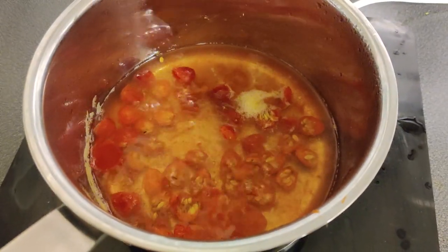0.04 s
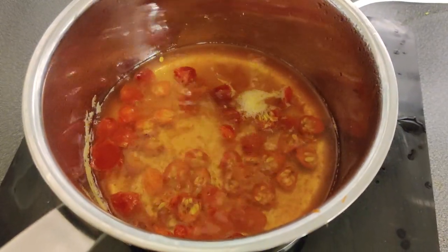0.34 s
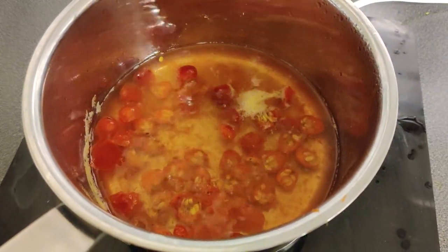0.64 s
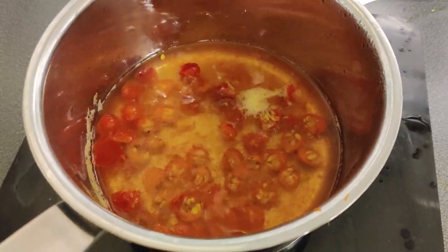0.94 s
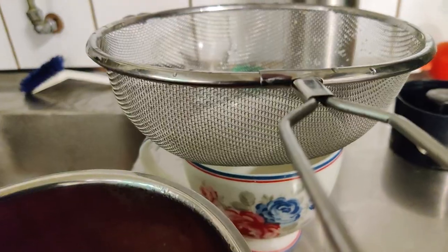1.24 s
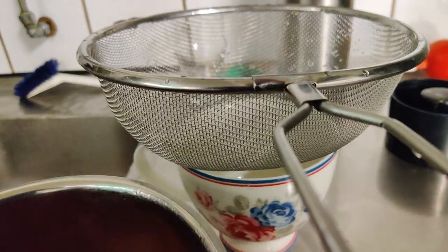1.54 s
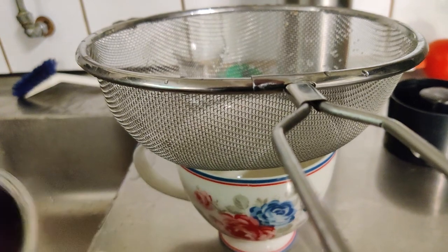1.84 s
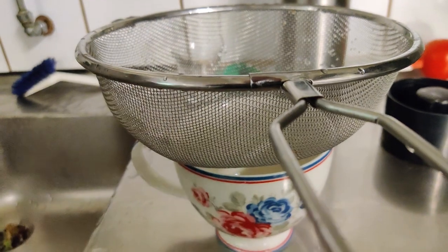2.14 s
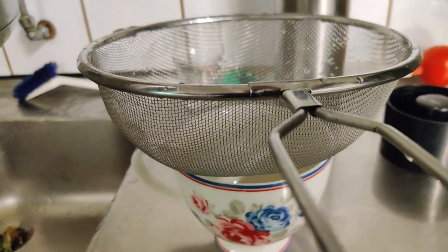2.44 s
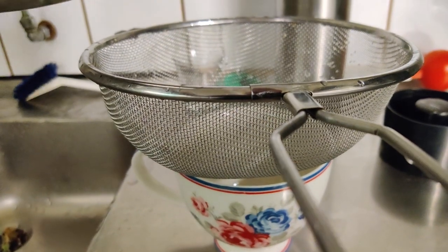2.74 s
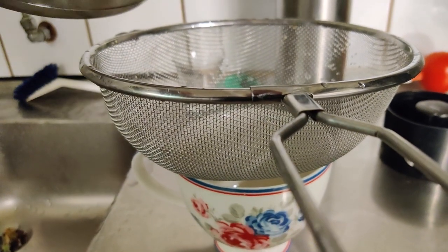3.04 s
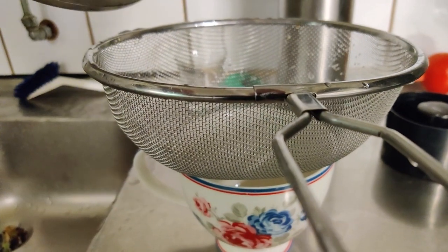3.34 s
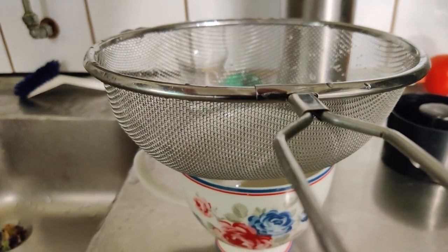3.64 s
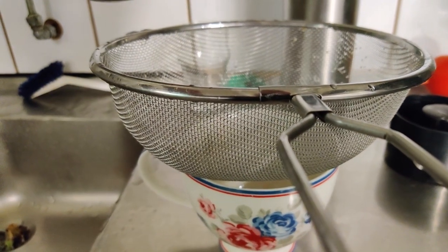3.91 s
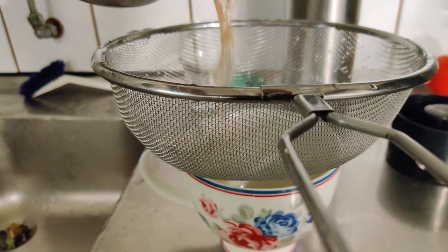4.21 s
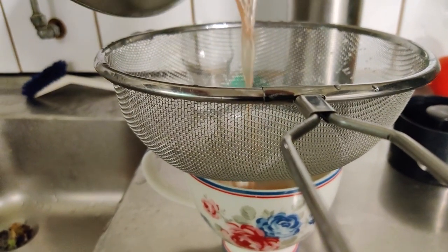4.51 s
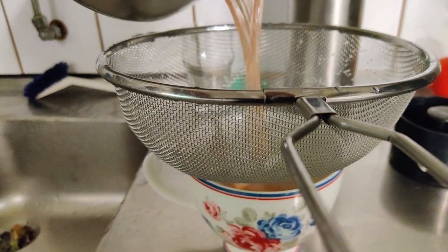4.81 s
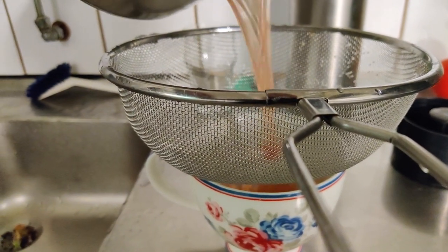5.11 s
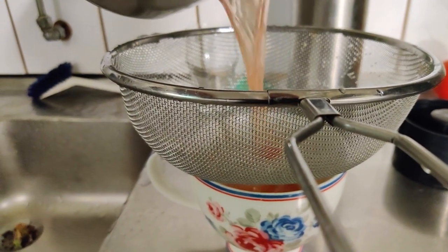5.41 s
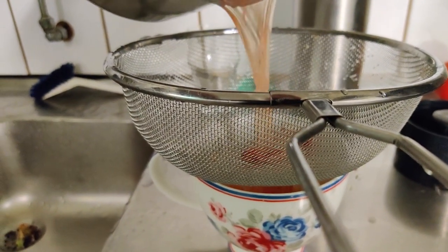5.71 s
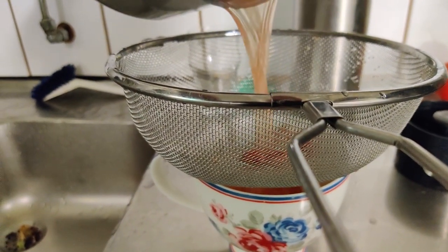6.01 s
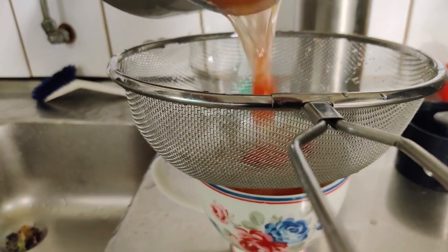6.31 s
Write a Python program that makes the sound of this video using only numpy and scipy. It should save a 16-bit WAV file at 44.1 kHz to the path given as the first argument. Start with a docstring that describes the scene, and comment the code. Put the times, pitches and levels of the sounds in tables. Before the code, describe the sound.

A pot simmers, then a door bumps over a humming, squeaky fan, and hot liquid patters through a mesh strainer into a mug.

```python
"""A pot simmers over the low rush of a kitchen hob; after a short silence we are at the sink.
There a fan hums and hisses, its dry bearing chirping by friction, and brief sizzles pass.
Something like a door bumps shut nearby, each impact exciting the damped modes of its panel.
Hot tea is then poured from the steel pot: drops patter on a mesh strainer, and bubbles resonate
in the mug below. The tiled room reverberates."""
import sys
import numpy as np
from scipy import signal
from scipy.fft import rfft, irfft, next_fast_len
from scipy.io import wavfile
from scipy.ndimage import map_coordinates

SR = 44100
rng = np.random.default_rng(int(sys.argv[2]) if len(sys.argv) > 2 else 0)


def store_wav(level_fs):
    """Save 16-bit WAV to argv[1]."""
    pcm = np.round(np.clip(np.atleast_2d(level_fs), -1, 1) * 32767)
    wavfile.write(sys.argv[1], SR, pcm.T.astype(np.int16))


N = 284886

# How hard the tea runs from the pot: (time [s], relative level [dB])
TEA_FLOW = [(4.2, -22), (4.37, -4.5), (4.6, -4.5), (4.66, -3), (5.1, 0), (5.3, -5), (5.54, -2), (5.97, -6),
            (6.08, 2), (6.29, -8.5), (6.46, 1.5)]
# Colour of the patter on the mesh: (frequency [Hz], gain [dB])
PATTER_RESPONSE = [(1500, 11), (3000, 1), (4300, -2.5), (6200, 1.5), (7600, -4.5), (9800, 2), (12000, -3),
                   (15500, 0)]
# Spurts of fine spray off the mesh: (time [s], level [dB])
SPRAY_SPURTS = [(4.364, -32), (4.4, -40), (4.44, -35), (4.568, -39), (4.65, -38), (4.675, -37),
                (4.758, -32), (4.796, -37), (4.808, -33), (4.883, -41), (4.916, -39.5), (5.028, -44),
                (5.078, -41.5), (5.096, -44), (5.394, -39), (5.502, -41), (5.568, -43), (5.638, -46),
                (5.687, -45), (5.724, -39), (5.785, -47), (6.044, -39.5), (6.077, -42), (6.159, -44)]
# Colour of the spray: (frequency [Hz], gain [dB])
SPRAY_RESPONSE = [(3000, -25), (6200, 0.5), (7600, -5), (9800, 5.5), (11300, 0), (12500, -2), (15500, -11)]
# Drops striking mesh and steel: (time [s], level [dB], frequency [Hz], relative spatter level [dB])
DROP_IMPACTS = [(4.22, -24, 5930, -17), (4.249, -28, 6050, -18), (4.4355, -22, 4000, -20),
                (4.436, -23, 6500, -18), (4.437, -21, 13000, -17), (4.503, -14.5, 7000, -17),
                (4.514, -22, 6500, -17), (4.5337, -13.5, 5900, -20), (4.535, -17, 9400, -12),
                (4.542, -16.5, 4900, -21), (4.648, -29, 5340, -9), (4.698, -27, 4200, -14),
                (4.7335, -9.5, 5400, -24), (4.758, -25, 6000, -12), (4.83, -26, 3900, -14),
                (4.855, -22.5, 6360, -26), (4.943, -18.5, 5940, -26), (4.9795, -15.5, 6350, -30),
                (5.142, -27, 6290, -22), (5.472, -22, 6700, -18), (5.989, -24.5, 4250, -21),
                (6.38, -28, 4010, -20)]
# Large bubbles in the mug: (time [s], level [dB], frequency [Hz], relative splat level [dB])
MUG_PLOPS = [(4.807, -30, 750, -12), (4.937, -31, 1200, -10), (5.169, -24.5, 1130, -16),
             (5.394, -30, 800, -12), (5.531, -22.5, 600, -15), (5.536, -28.5, 880, -10),
             (5.567, -28, 790, -14), (5.602, -26.5, 1140, -13), (5.668, -30, 690, -12),
             (6.083, -31, 1170, -11), (6.158, -24, 1230, -3), (6.207, -32, 1290, -3),
             (6.278, -29, 676, -12)]
# Door impacts: (time [s], thud level [dB], ring level [dB], crack level [dB], contact time [s])
DOOR_BLOWS = [(1.495, -14.5, -15.5, -36, 0.0063), (1.507, -16.5, -19, -27, 0.014),
              (1.548, -33, -31, -42, 0.0073), (1.577, -28, -18.5, -57, 0.0042),
              (1.642, -10.5, -16.5, -12.5, 0.0008), (1.664, -24, -16.5, -40, 0.0014),
              (1.703, -19.5, -21, -26, 0.002), (1.737, -36.5, -19.5, -46, 0.0033)]
# Modes of the door panel: (frequency [Hz], relative level [dB], t60 [s])
DOOR_MODES = [(94, -8.5, 0.23), (128, -5.5, 0.27), (192, -12, 0.34), (252.5, -2, 0.42), (287, -1, 0.17),
              (366.6, -7.5, 0.41), (421, -3, 0.23), (468, 1, 0.078), (586, -11.5, 0.3), (735, -16, 0.2),
              (950, -26, 0.3), (1305, -13, 0.22)]
# The door's thud, its catch and the air it pushes: (frequency [Hz], relative spectral level [dB])
THUD_SPECTRUM = [(15, -35), (25, -10), (122, 2.5), (195, -6.5), (262, -1), (331, -0.5), (600, -9.5),
                 (839, -13.5), (1680, -19), (4730, -28), (6130, -28), (12000, -29.5), (15600, -64),
                 (22000, -120)]
CRACK_SPECTRUM = [(410, -26), (700, -2), (1350, -18), (1870, 0), (2430, -13.5), (5920, -8), (10100, -15.5),
                  (16000, -30)]
PUSH_SPECTRUM = [(20, 2), (40, -18), (80, 0), (140, -9), (400, -70), (2000, -110)]
# Bouts of squeaking from the fan's bearing: (time [s], duration [s], level [dB])
SQUEAK_BOUTS = [(0, 0.15, -55), (0.737, 0.046, -56), (1.768, 0.27, -43), (2.137, 0.09, -41.5),
                (2.356, 0.37, -41), (2.817, 0.41, -43.5), (3.29, 0.68, -43), (4.295, 0.073, -42.5),
                (4.786, 0.32, -41.5), (5.4, 0.5, -42), (6.233, 0.17, -41.5)]
# Brief sizzles: (time [s], level [dB], nominal duration [s])
SIZZLE_PUFFS = [(1.922, -40, 0.23), (2.193, -37, 0.071), (2.911, -35.5, 0.16), (3.48, -45, 0.087),
                (3.86, -36.5, 0.1)]
# Their hiss: (frequency [Hz], relative spectral level [dB])
SIZZLE_SPECTRUM = [(2500, -11), (4500, -6), (6200, -2), (7500, -7), (10000, -2), (12500, -12), (15500, -20)]
# The hob's rush, hollow ring, drone and simmer: (frequency [Hz], relative spectral level [dB])
RUSH_SPECTRUM = [(25, -3), (70, -10), (110, -5), (310, -4.5), (362, 3.5), (405, -4), (445, -1.5),
                 (510, -10), (1100, -11), (1600, -15.5), (2200, -15.5), (3300, -24), (6300, -30),
                 (7500, -34), (9700, -34), (15000, -68)]
HOLLOW_SPECTRUM = [(1150, -60), (1290, 1), (1420, -50)]
DRONE_SPECTRUM = [(310, -27), (362, 8), (420, -41)]
SIMMER_SPECTRUM = [(1500, -11), (2200, 0.5), (3200, -8), (5000, -7), (6200, 2.5), (7500, -21),
                   (10000, -17), (15000, -39)]
# Air moved by the fan: (frequency [Hz], relative spectral level [dB])
AIR_SPECTRUM = [(25, -22), (60, -2), (80, -1.5), (125, 1), (165, -16), (260, -5.5), (420, -4), (500, -10.5),
                (700, -8.5), (1000, -11.5), (1400, -16.5), (2400, -15.5), (3200, -20.5), (5200, -21.5),
                (5900, -18.5), (6500, -21), (7500, -29), (10000, -24.5), (12000, -29.5), (13000, -35),
                (14800, -42), (15500, -54)]
# The fan's shaft and five blades: (multiple of the rotation rate [1], level [dB])
FAN_HARMONICS = [(1, -47.5), (5, -38.5), (20, -49.5)]
# Hum of other motors and the mains: (frequency [Hz], level [dB])
HUM_TONES = [(39.7, -42.5), (50, -46.5), (100, -47), (317.6, -52)]
# Electronic whine: (frequency [Hz], carrier level [dB])
WHINE_TONES = [(8491, -60), (8541, -65), (8688, -68), (11057, -66.5), (11403, -62.5)]
# Reverberation of the kitchen, scaled for each source: (frequency [Hz], reference t60 [s])
ROOM_DECAY = [(60, 0.45), (300, 0.37), (1500, 0.38), (6000, 0.29), (14000, 0.2)]
# Likeness of left and right in the diffuse field: (frequency [Hz], coherence [1])
COHERENCE = [(40, 0.95), (120, 0.92), (250, 0.81), (450, 0.74), (800, 0.29), (1300, 0), (15000, 0)]
# Imbalance of the two microphone ports: (frequency [Hz], left minus right level [dB])
PORT_BALANCE = [(100, 1.5), (300, 2), (1300, 1), (2200, -1), (3200, -0.5), (5100, 1), (5900, 8),
                (7200, 0.5), (8200, -12), (9300, -17), (11500, -17.5), (14500, -3.5)]

HOB_END_S, SINK_START_S, SWELL_S = 1.052, 1.245, 0.37
FAN_HZ, MAINS_HZ, TOP_HZ = 21.74, 50, 15900


def patter():
    """Impact noise: droplets and bursting films ring on the mesh, louder until it is wet."""
    t, flow_db = seconds(N / SR), curve(TEA_FLOW)
    full_flow_s, wetting_s = TEA_FLOW[1][0], 0.54
    dry_mesh_db = 6 * np.exp(-np.maximum(t - full_flow_s, 0) / wetting_s)
    level_db = -47 + flow_db + dry_mesh_db + 1.2 * wobble(per_s=27)  # the stream wavers
    droplets = np.array([grains(3000, 7900, spread=0.425, cycles=7.9, glide=0, scatter_db=3.5, size=96)
                         for _ in range(2)])
    pops = grains(60, 6300, spread=0.33, cycles=12, glide=0.04, scatter_db=2.5, size=400)
    impacts = coloured(droplets + amp(-7) * pops, PATTER_RESPONSE)
    return room(amp(level_db) * impacts, wet_db=3.5, life=0.48)


def spray():
    """Superposition: in each spurt off the mesh, tiny bursting droplets merge into a hiss."""
    spurts = np.max([amp(db) * held(s, 0.0029, rise_db_per_s=1100, fall_db_per_s=380)
                     for s, db in SPRAY_SPURTS], axis=0)
    cloud = np.array([grains(1500, 9500, spread=0.28, cycles=10, glide=0.03, scatter_db=3.2, size=120)
                      for _ in range(2)])
    return room(spurts * coloured(cloud, SPRAY_RESPONSE), wet_db=-3, life=0.37)


def drops():
    """Impulse response: a single drop ticks, smacks, rings for a few cycles and throws spatter."""
    out, t = np.zeros((2, N)), seconds(0.18)
    for s, db, hz, spatter_db in DROP_IMPACTS:
        splash_band = [(hz / 3, -26), (hz * 0.62, -6), (hz, 0), (hz * 1.18, -4), (hz * 1.4, -24)]
        tick_band = [(hz / 4, -16), (hz * 0.95, -1), (hz, 0), (hz * 2, -18)]
        smack = amp(-16) * decay(t, t60=0.018)
        spatter = amp(spatter_db) * decay(t, t60=0.085)
        splash = (smack + spatter) * diffuse(splash_band, len(t))
        tick = amp(-22) * decay(t, t60=0.0043) * diffuse(tick_band, len(t))
        ring = 0.55 * bubble(t, 0.8 * hz, cycles=5, glide=0)
        ring += 0.72 * bubble(t, hz, cycles=11, glide=0.05)
        add(out, s, amp(db) * (ring + splash + tick))
    return room(out, wet_db=-5.5, life=0.73)


def mug_bubbles():
    """Bubble resonance: air rings in the mug, weakly until the tea covers the bottom."""
    covered_s, rise_db_per_s = 4.84, 22
    empty_db = rise_db_per_s * np.maximum(covered_s - seconds(N / SR), 0)
    level_db = -49 + curve(TEA_FLOW) - empty_db
    bubbles = grains(190, 830, spread=0.36, cycles=8, glide=0.05, scatter_db=3, size=1400)
    return room(amp(level_db) * bubbles, wet_db=1, life=0.35)


def plops():
    """Bubble resonance: single large bubbles splat and ring briefly in the filling mug."""
    out, t = np.zeros((2, N)), seconds(0.1)
    for s, db, hz, splat_db in MUG_PLOPS:
        band = [(hz / 2, -10), (hz, 0), (hz * 1.8, -7), (hz * 3, -20)]
        splat = amp(splat_db) * decay(t, t60=0.054) * diffuse(band, len(t))
        add(out, s, amp(db) * (0.6 * bubble(t, hz, cycles=15, glide=0.03) + splat))
    return room(out, wet_db=-7.5, life=0.48)


def door():
    """Impact excitation: each blow thuds, rings the panel and cracks the catch; the swing pushes air."""
    thuds, rings, cracks, t = np.zeros((2, N)), np.zeros(N), np.zeros((2, N)), seconds(0.94)
    for s, thud_db, ring_db, crack_db, contact_s in DOOR_BLOWS:
        thud = attack(t, 0.011) * reverberation(THUD_SPECTRUM, life=0.77)[:, :len(t)]
        add(thuds, s, amp(thud_db) * thud)
        add(rings, s, amp(ring_db) * attack(t, 0.0044) * panel(t, contact_s))
        snap = attack(t, contact_s) * decay(t, t60=0.03 + 14 * contact_s)
        add(cracks, s, amp(crack_db) * snap * diffuse(CRACK_SPECTRUM, len(t)))
    swing = held(start_s=1.505, hold_s=0.24, rise_db_per_s=294.5, fall_db_per_s=135)
    push = amp(-24.5) * swing * diffuse(PUSH_SPECTRUM)
    return thuds + room(rings, wet_db=-8, life=0.65) + room(cracks, wet_db=-2.5, life=1.4) + push


def panel(t, contact_s):
    """Modal vibration of the door: a long, soft contact favours the low modes."""
    out = np.zeros(len(t))
    for hz, db, t60 in DOOR_MODES:
        strength = amp(db + rng.normal()) / np.hypot(1, hz * contact_s)
        out += strength * decay(t, t60) * np.sin(2 * np.pi * (hz * t + rng.random()))
    return out


def bearing():
    """Dry friction: in bouts, the fan's bearing catches once a turn and chirps over a rough rasp."""
    catch_at_s, chirp_width_s, chirp_hz, pitch_scatter = 1.784, 0.027, 2172, 0.00503
    rasp_hz, rasp_width_hz = 2246, 225
    turns = (seconds(N / SR) - catch_at_s) * FAN_HZ
    turn = np.round(turns).astype(int)
    catch = np.exp(-2 * ((turns - turn) / FAN_HZ / chirp_width_s) ** 2)
    per_turn = rng.standard_normal((np.ptp(turn) + 1, 4))  # no two chirps are alike
    pitch, strength_db, *port_phases = per_turn[turn - turn[0]].T
    hz = chirp_hz * (1 + pitch_scatter * (pitch + 2 * wobble(per_s=250)))
    phase = 2 * np.pi * (np.cumsum(hz) / SR + np.array(port_phases))
    chirps = unit(catch * amp(strength_db) * np.sin(phase))
    rub = filtered(rng.standard_normal((2, N)), lambda f: (1 + 2j * (f - rasp_hz) / rasp_width_hz) ** -2)
    rasp = amp(-2.5) * unit(rub * (catch + 0.35))
    bouts = np.max([amp(db) * held(s, length, rise_db_per_s=303, fall_db_per_s=222.5)
                    for s, length, db in SQUEAK_BOUTS], axis=0)
    pan = amp([[-1], [1]])
    return bouts * unit(room(chirps + rasp, wet_db=-8.5, life=0.17)) * pan


def sizzles():
    """Noise transients: puffs of hiss swell quickly and fade exponentially."""
    out, t = np.zeros((2, N)), seconds(0.94)
    for s, db, length in SIZZLE_PUFFS:
        age = t / (length * 0.16)  # the puff peaks at age 1
        add(out, s, amp(db) * age * np.exp(1 - age) * diffuse(SIZZLE_SPECTRUM, len(t)))
    return out


def hob():
    """Broadband and narrowband noise: the hob rushes, rings and drones as the simmer settles."""
    flare_db = 12 * np.exp(-seconds(N / SR) / 0.12)
    hollow = amp(-14.5) * diffuse(HOLLOW_SPECTRUM)
    drone = amp(-13) * diffuse(DRONE_SPECTRUM)
    rush = amp(-45) * (diffuse(RUSH_SPECTRUM) + hollow + drone)
    simmer = amp(-61 + flare_db) * diffuse(SIMMER_SPECTRUM)
    motor = tone(HUM_TONES[0][0], db=-54, drift_rad=0.4)
    return rush + simmer + motor + amp(-25) * whine()


def appliances():
    """Rotation harmonics and flow noise of the fan, over motor hum, mains hum and whine."""
    blades = sum(tone(k * FAN_HZ, db, drift_rad=0.078) for k, db in FAN_HARMONICS)
    hum = sum(tone(hz, db, drift_rad=0.063) for hz, db in HUM_TONES)
    return amp(-34.5) * diffuse(AIR_SPECTRUM) + blades + hum + whine()


def whine():
    """Amplitude modulation: mains ripple on thin electronic tones, their phases different at each port."""
    carriers = np.array([sum(tone(hz, db, drift_rad=0.85) for hz, db in WHINE_TONES) for _ in range(2)])
    return carriers * (1 + np.cos(2 * np.pi * MAINS_HZ * seconds(N / SR)))


def room(x, wet_db, life):
    """Convolution: the direct sound plus its reverberation in the tiled kitchen."""
    tail = reverberation([(20, 0), (20000, 0)], life)
    echo = signal.fftconvolve(np.atleast_2d(x), tail / np.linalg.norm(tail[0]), axes=1)[:, :N]
    return x + amp(wet_db) * echo


def reverberation(spectrum, life):
    """Absorption: each frequency of a noise tail has life times the room's reference t60."""
    hz, t, bins = signal.stft(diffuse(spectrum, SR), SR, nperseg=256)
    t60 = life * along(ROOM_DECAY, hz)[:, None]
    return signal.istft(bins * decay(t, t60), SR, nperseg=256)[1]


def diffuse(spectrum, size=N):
    """Diffuse field: stereo noise of rms 1, coherent in the bass and incoherent in the treble."""
    def mid_side_gains(hz):
        angle = np.arccos(np.clip(along(COHERENCE, hz), -1, 1)) / 2
        return amp(along(spectrum, hz)) * [np.cos(angle), np.sin(angle)]
    mid, side = filtered(rng.standard_normal((2, size)), mid_side_gains)
    return unit(np.array([mid + side, mid - side]))


def bubble(t, hz, cycles, glide):
    """Damped oscillator: a ring whose pitch, given a glide, rises slightly as it fades."""
    age = t * hz / cycles
    return np.sin(2 * np.pi * hz * t * (1 + glide * age)) * amp(-20 * age) * attack(t, 0.5 / hz)


def grains(per_s, centre_hz, spread, cycles, glide, scatter_db, size):
    """Shot noise of rms 1: small damped rings, each size samples long, start at random times."""
    count = int(per_s * N / SR)
    start = rng.integers(0, N, (count, 1))
    hz = np.minimum(centre_hz * np.exp(spread * rng.standard_normal((count, 1))), TOP_HZ)
    strength = amp(scatter_db * np.minimum(rng.exponential(size=(count, 1)), 4))
    rings = strength * bubble(np.arange(size) / SR, hz, cycles, glide)
    return unit(np.bincount((start + np.arange(size)).ravel(), rings.ravel(), N)[:N])


def tone(hz, db, drift_rad):
    """Phase modulation: a sinusoid of rms level db drifts slowly."""
    phase = 2 * np.pi * (hz * seconds(N / SR) + rng.random())
    return np.sqrt(2) * amp(db) * np.sin(phase + drift_rad * wobble(per_s=1.96))


def held(start_s, hold_s, rise_db_per_s, fall_db_per_s):
    """Exponential envelope: it rises to 1 at start_s, holds and falls."""
    age = seconds(N / SR) - start_s
    return amp(-rise_db_per_s * np.maximum(-age, 0) - fall_db_per_s * np.maximum(age - hold_s, 0))


def attack(t, rise_s):
    """Exponential approach to 1."""
    return 1 - np.exp(-t / rise_s)


def decay(t, t60):
    """Exponential decay of 60 dB in t60 seconds."""
    return amp(-60 * t / t60)


def wobble(per_s):
    """A smooth random curve with per_s knots a second."""
    knots = rng.standard_normal(int(N * per_s / SR) + 4)
    return map_coordinates(knots, [np.arange(N) * per_s / SR])


def filtered(x, response):
    """Linear filter: the spectrum of x times a frequency response."""
    n = x.shape[-1]
    padded = next_fast_len(n + SR // 4)
    return irfft(rfft(x, padded) * response(np.fft.rfftfreq(padded, 1 / SR)), padded)[..., :n]


def coloured(x, gains_db):
    """Spectral shaping by a table of gains, scaled to rms 1."""
    return unit(filtered(x, lambda hz: amp(along(gains_db, hz))))


def along(points, hz):
    """Interpolation on a logarithmic frequency axis."""
    frequencies, values = np.transpose(points)
    return np.interp(np.log(hz + 1), np.log(frequencies + 1), values)


def curve(points):
    """Interpolation in time, one value a sample."""
    return np.interp(seconds(N / SR), *np.transpose(points))


def add(track, s, sound):
    """Superpose a sound on a track at time s."""
    part = track[..., round(s * SR):][..., :sound.shape[-1]]
    part += sound[..., :part.shape[-1]]


def amp(db):
    """Decibels to gain."""
    return 10 ** (np.asarray(db) / 20)


def unit(x):
    """Scale to rms 1."""
    return x / np.sqrt(np.mean(x ** 2) + 1e-20)


def seconds(length):
    """A time axis."""
    return np.arange(round(length * SR)) / SR


def scene():
    """Superposition: first the hob, then silence, then the sink; the bearing is heard from both."""
    t = seconds(N / SR)
    swell = np.clip((t - SINK_START_S) / SWELL_S, 0, 1) ** 0.68
    sink = swell * appliances() + door() + sizzles()
    tea = patter() + spray() + mug_bubbles() + drops() + plops()
    return hob() * (t < HOB_END_S) + (sink + tea) * (t > SINK_START_S) + bearing()


def record(dry):
    """Frequency response: each microphone port has its own colour, and nothing passes above TOP_HZ."""
    def ports(hz):
        ratio = amp(along(PORT_BALANCE, hz))
        balance = np.array([ratio, np.ones_like(ratio)]) / np.sqrt((1 + ratio ** 2) / 2)
        return balance * np.clip((TOP_HZ - hz) / 200, 0, 1)
    return filtered(dry, ports)


dry = scene()
out = record(dry)
store_wav(out)
```